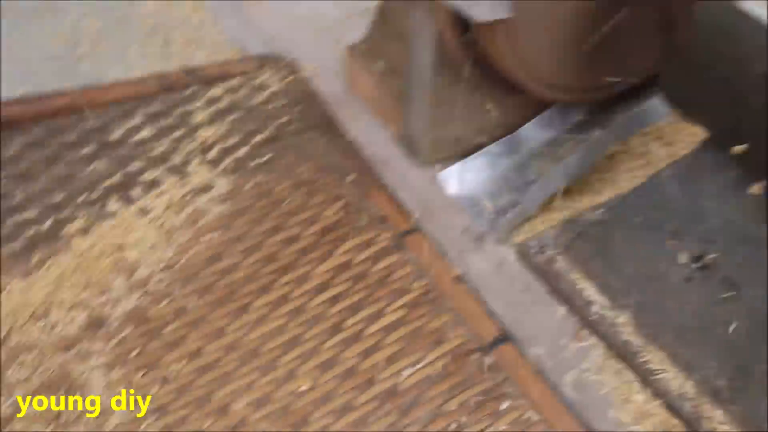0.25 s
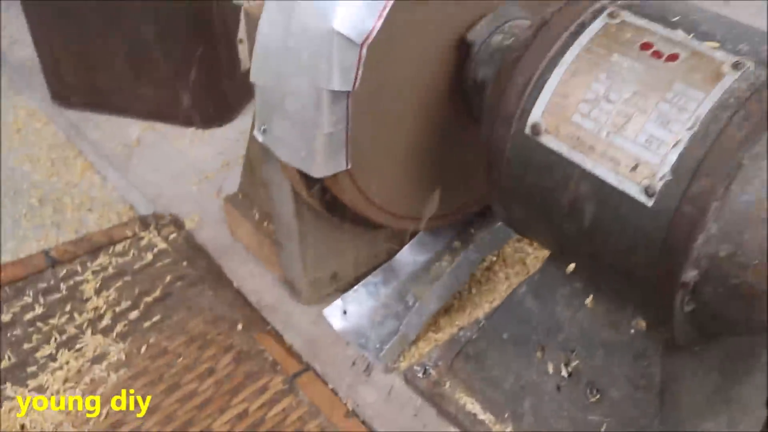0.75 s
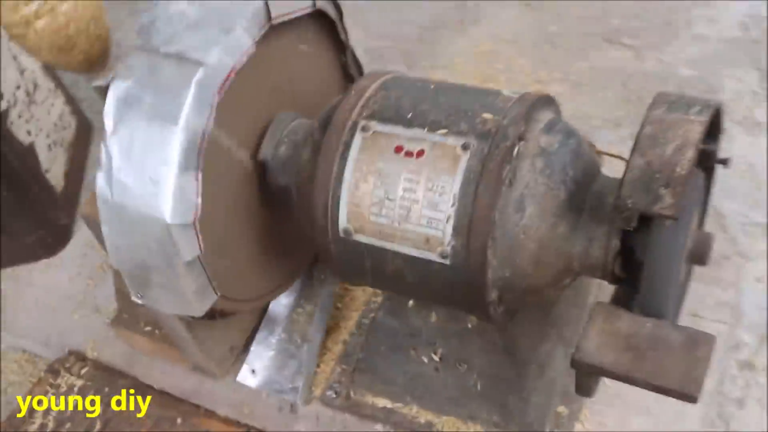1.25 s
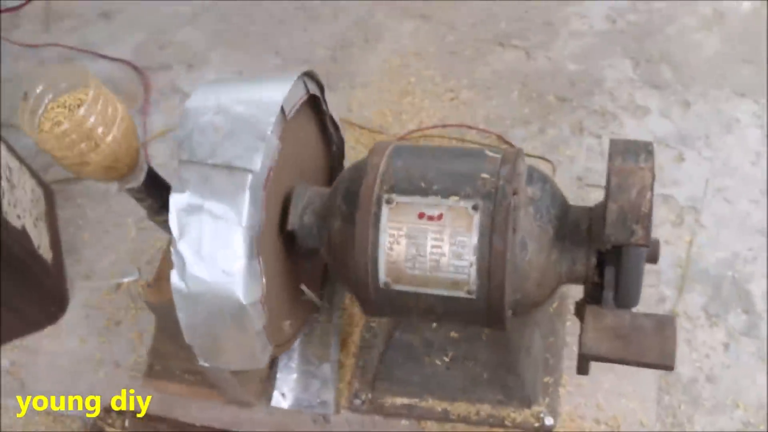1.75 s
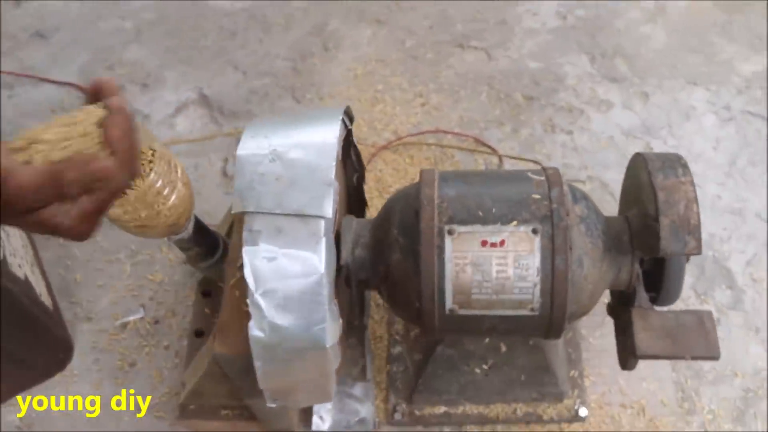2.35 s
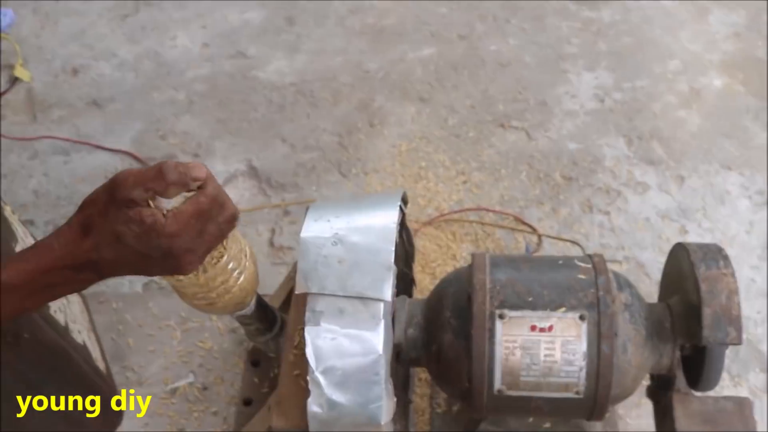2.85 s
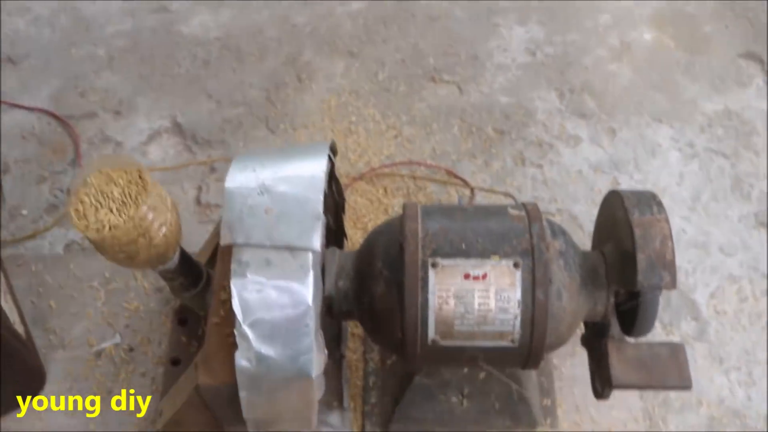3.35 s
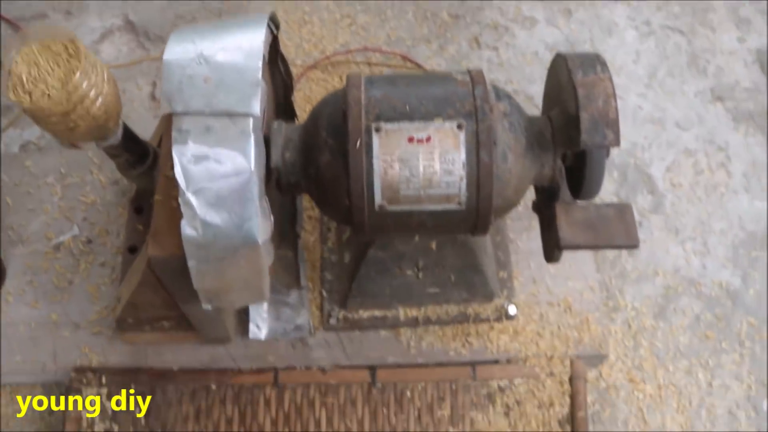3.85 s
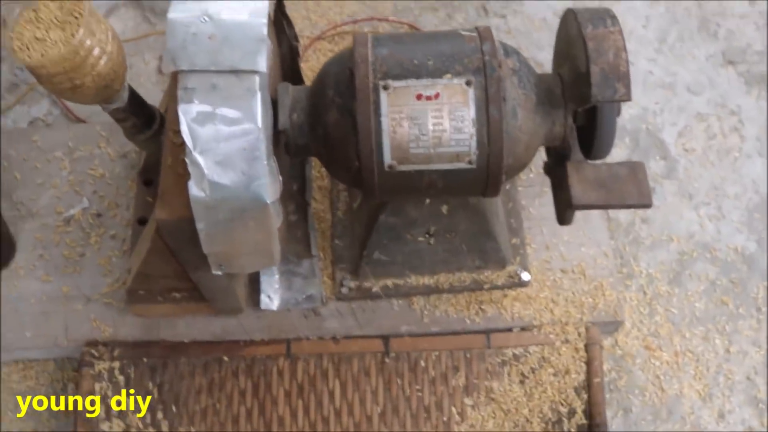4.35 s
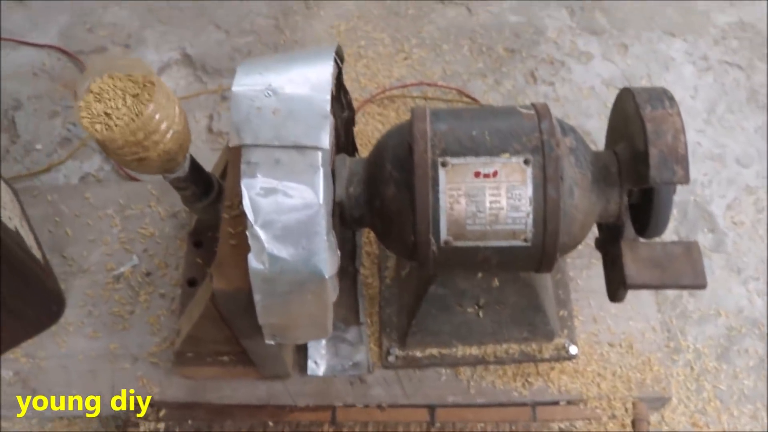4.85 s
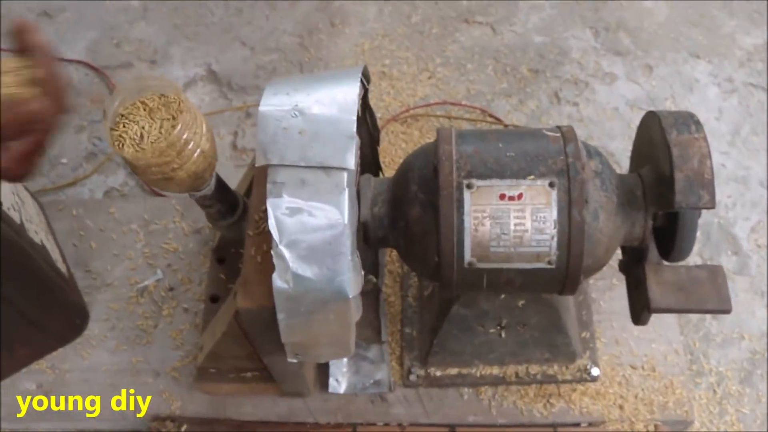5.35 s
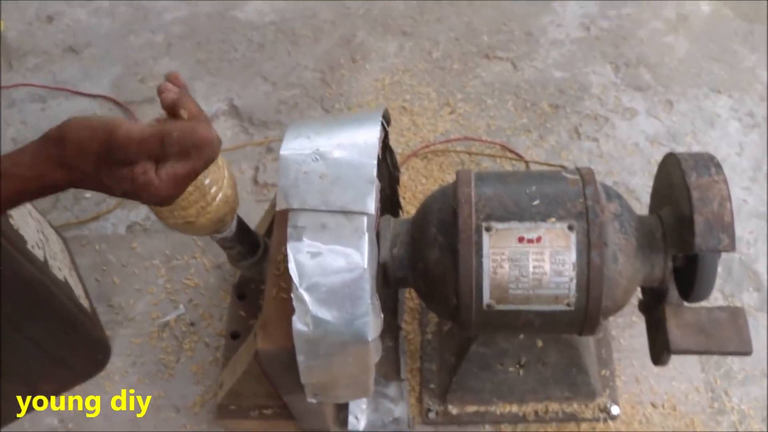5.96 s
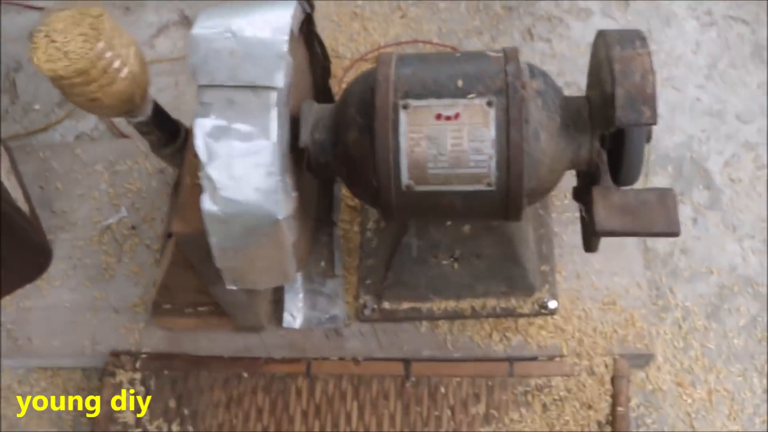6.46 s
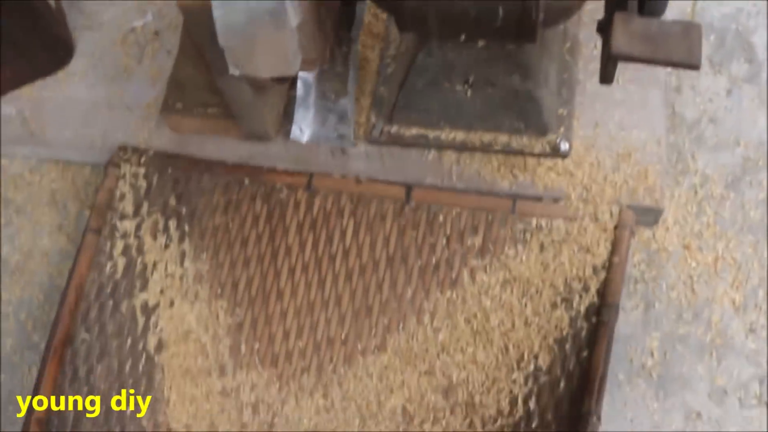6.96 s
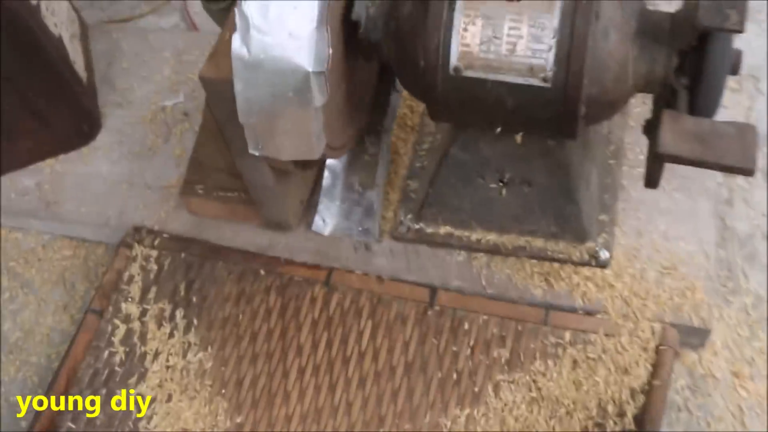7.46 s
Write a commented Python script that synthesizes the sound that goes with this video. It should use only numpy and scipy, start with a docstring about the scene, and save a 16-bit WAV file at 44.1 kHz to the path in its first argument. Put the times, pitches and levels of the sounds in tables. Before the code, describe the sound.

Close, unbroken harsh rasp of paddy being husked, peppered with kernel cracks and taps on sheet metal, over a faint steady motor hum.

```python
"""A dense crackle of paddy husked by a steadily turning bench grinder, heard from close above.
Grain contacts are enveloped noise and clicks; kernels crack, tick on sheet metal and ring its modes.
Beneath them the casing rubs as noise modulated by the turning disc, the motor hums in sine harmonics
of the shaft speed, and the base sounds as filtered noise. A moving microphone shifts the levels."""
import sys
import numpy as np
from scipy import signal
from scipy.fft import rfft, irfft, next_fast_len
from scipy.io import wavfile
from scipy.ndimage import uniform_filter1d, map_coordinates

SR = 44100
rng = np.random.default_rng(int(sys.argv[2]) if len(sys.argv) > 2 else 0)


def wrap_up_sound(samples):
    """Save the sound to the file named by the first command line argument, as 16-bit audio."""
    columns = np.atleast_2d(samples).T
    # keep every value between -1 and 1, then stretch to whole-number steps
    tamed = np.clip(columns, -1, 1)
    steps = np.round(tamed * 32767).astype(np.int16)
    wavfile.write(sys.argv[1], SR, steps)


N = 340011

# Levels in the tables are relative: layer trims, resonances and ports act after them.
# grain being worked, on average: (time [s], rasp level [dB], spray level [dB])
FEED = [(0.0, -30.5, -34), (0.25, -32.5, -35.5), (0.55, -32, -35), (1.1, -32.5, -37), (1.7, -32, -35),
        (2.1, -33.5, -34.5), (2.75, -31.5, -36.5), (3.3, -32.5, -35), (4.0, -31, -34.5), (4.75, -32, -36.5),
        (5.5, -32.5, -36), (6.25, -31, -38), (6.7, -32, -37.5), (7.25, -33.5, -33.5), (7.71, -35.5, -38.5)]
# gulps of paddy: (time [s], width at half height [s], rasp gain [dB], spray gain [dB])
GULPS = [(0.375, 0.021, -1, 6), (0.576, 0.021, 2.5, 6), (1.02, 0.075, 4.5, -2), (1.406, .03, 2.5, -4),
         (1.908, 0.024, 4, 5), (2.778, 0.042, 3, 3), (4.494, 0.096, 0, 5.5), (4.632, 0.03, 4.5, 1),
         (4.889, .04, 5, 4), (4.954, 0.018, 1, 10), (5.09, 0.04, 2.5, 4), (5.327, 0.038, 0, 3.5),
         (5.847, 0.12, 3, 5), (6.214, 0.02, 3, 7.5), (6.775, 0.037, 3, 5), (7.67, 0.086, 5.5, 6)]
# moments when the hopper's neck starves: (time [s], width at half height [s], drop [dB])
LULLS = [(0.193, 0.041, 4), (0.356, 0.018, 3.5), (0.717, 0.012, 4.5), (1.273, 0.017, 5), (1.34, 0.04, 2.5),
         (1.736, 0.027, 3), (1.858, 0.019, 4), (2.187, .012, 3), (3.252, 0.02, 8), (3.791, 0.026, 9.5),
         (4.41, 0.024, 8), (4.54, 0.039, 5.5), (4.928, 0.025, 5), (4.978, 0.026, 6), (5.653, .035, 5.5),
         (5.765, 0.043, 5), (6.435, 0.018, 1), (6.833, 0.021, 4), (6.977, 0.033, 4.5)]
# kernels crushed under the disc: (time [s], peak level [dB], pitch [Hz])
CRACKS = [(0.0672, -17, 3840), (0.0872, -20, 3700), (0.119, -21, 4720), (0.1514, -23, 5050),
          (0.269, -20.5, 4820), (0.2883, -19, 4660), (0.386, -21, 3670), (0.5524, -18.5, 5230),
          (0.5833, -21, 5200), (0.6764, -18, 5030), (0.817, -17, 3560), (0.993, -16, 5600),
          (1.0066, -16, 3400), (1.0184, -16, 3650), (1.1164, -17, 4700), (1.1977, -15.5, 3330),
          (1.389, -25, 5210), (1.4094, -12, 4400), (1.6891, -20, 3730), (2.015, -17, 4530),
          (2.33, -16, 5080), (2.4683, -19, 5760), (2.4826, -18, 5580), (2.651, -12, 5100),
          (2.677, -14, 5500), (2.764, -18, 5160), (2.8795, -24, 5740), (3.039, -21, 5650),
          (3.3423, -18, 4200), (3.4454, -16, 5540), (3.5756, -14, 3820), (3.628, -17, 3560),
          (3.8781, -18, 3850), (3.9993, -18, 5300), (4.0825, -19, 3760), (4.1684, -24, 4000),
          (4.2917, -14, 4300), (4.442, -14.5, 5800), (4.6215, -23, 4240), (4.692, -19, 4280),
          (4.638, -16, 5740), (4.7102, -15, 5360), (4.8075, -14.5, 3890), (4.825, -12.5, 4060),
          (4.861, -22, 4130), (4.8815, -19, 5670), (5.0347, -16, 5700), (5.0866, -17, 4090),
          (5.4136, -20, 4950), (5.441, -17, 3900), (5.4564, -16.5, 3860), (5.674, -15, 4550),
          (5.8157, -16.5, 4080), (5.905, -21, 3830), (6.0463, -15, 5730), (6.055, -14.5, 4480),
          (6.115, -20, 4050), (6.127, -17, 4000), (6.2043, -20, 4110), (6.2228, -19, 3740),
          (6.2417, -13, 3800), (6.3031, -14, 5900), (6.328, -16, 4400), (6.395, -16, 4040),
          (6.477, -14.5, 5170), (6.534, -14, 3840), (6.54, -21, 3920), (6.622, -12, 4900),
          (6.7943, -17, 4010), (6.931, -24, 5500), (7.0078, -16.5, 5700), (7.4455, -18, 3770),
          (7.454, -17, 4600), (7.574, -23, 5610)]
# grains flung against sheet metal: (time [s], peak level [dB])
TICKS = [(0.0074, -21), (0.1116, -19), (0.2349, -22), (0.3691, -22), (0.3785, -15), (0.4494, -16.5),
         (0.5407, -19), (0.5641, -22), (0.7574, -16.5), (0.7996, -14.5), (0.8729, -16), (0.9792, -15),
         (1.1882, -17), (1.4264, -20), (1.4504, -15), (1.4864, -25), (1.6904, -16), (1.8906, -24),
         (1.92, -15), (1.9744, -18), (2.1362, -20), (2.1625, -18), (2.1695, -19), (2.1946, -20),
         (2.1985, -20), (2.2124, -19), (2.2413, -15.5), (2.4595, -19), (2.5625, -21), (2.8958, -17),
         (3.1165, -19), (3.3704, -21), (3.4705, -22), (3.5285, -17), (3.5917, -15), (3.713, -23),
         (3.8277, -16), (3.8444, -18), (3.916, -14), (3.9584, -18), (3.9884, -17), (4.0627, -15),
         (4.1297, -15), (4.1834, -17), (4.2009, -20), (4.3635, -21), (4.4657, -21), (4.705, -17),
         (4.7305, -17), (4.8189, -18), (4.8788, -24), (4.8973, -16), (4.9442, -21), (5.0524, -17),
         (5.1617, -20), (5.2135, -20), (5.252, -19), (5.3023, -19), (5.3226, -17), (5.3495, -19),
         (5.5039, -17), (5.528, -18), (5.675, -21), (5.8244, -18), (6.0457, -20), (6.115, -12.5),
         (6.1574, -16), (6.3505, -16), (6.3979, -14.5), (6.4734, -18), (6.4946, -18), (6.565, -18),
         (6.6014, -12), (6.6633, -15), (6.7095, -14), (6.736, -12), (6.8648, -17), (6.9301, -14),
         (7.0459, -17), (7.0868, -20), (7.0958, -14), (7.293, -18.5), (7.341, -15), (7.3887, -17.5),
         (7.4949, -16), (7.5748, -16), (7.611, -18), (7.6784, -18.5)]
# kernels that make the guard ring: (time [s], peak level [dB], favoured pitch [Hz])
PINGS = [(0.0682, -29, 2190), (0.0893, -26, 1800), (0.1511, -21, 1840), (0.3848, -21, 2340),
         (0.404, -21, 1900), (0.447, -23, 2280), (0.6764, -20, 2050), (0.9198, -21.5, 1840),
         (0.9941, -22, 2300), (1.0195, -21.5, 2220), (1.1638, -29, 1820), (1.1974, -22, 2050),
         (1.3972, -20, 2100), (1.4103, -19, 2200), (1.691, -24, 2350), (1.915, -27, 2300),
         (1.997, -23, 2300), (2.4688, -21, 2360), (2.649, -20, 2320), (3.446, -21, 2000),
         (3.5732, -20, 2320), (3.6663, -23, 1770), (3.9784, -31, 1830), (4.108, -20.5, 2250),
         (4.2921, -27, 2000), (4.6094, -21.5, 2310), (4.808, -24, 1750), (4.8274, -23, 2300),
         (5.4425, -24, 2100), (5.886, -22, 2290), (5.9174, -31, 1840), (6.003, -26, 2310),
         (6.017, -23, 2310), (6.1438, -21.5, 2300), (6.2053, -21.5, 1950), (6.223, -23, 2280),
         (6.3949, -23.5, 2260), (6.9484, -22.5, 1820), (7.0945, -26, 1810), (7.328, -24, 1830),
         (7.3395, -27, 1820), (7.454, -23.5, 1900), (7.5522, -25, 1950), (7.66, -21.5, 2400)]
# modes of the sheet-metal guard: (frequency [Hz], level [dB])
GUARD_MODES = [(1640, -12), (1815, -1), (1950, -2), (2150, -6), (2300, -2.5), (2430, -3), (2880, -2),
               (3550, -1), (4050, -1)]
# spectra of the noise layers: (frequency [Hz], level [dB per Hz])
RASP_SPECTRUM = [(200, -66), (1000, -23.5), (1450, -13), (1750, -2.5), (2050, -8.5), (2350, 0.5),
                 (3000, -4.5), (3900, -0.5), (5300, 0), (6400, -5), (8500, -12), (16000, -10.5)]
SPRAY_SPECTRUM = [(200, -70), (1000, -21), (2000, -4.5), (4000, -3), (7000, -1.5), (8400, -2.5),
                  (10000, 2.5), (11200, 2.5), (12800, 0.3), (14500, 1), (16000, -0.5)]
OPENING_SPECTRUM = [(1000, -73), (4800, -2.5), (5800, -0.5), (7300, -7.5), (8500, -11), (12000, -37)]
CASING_SPECTRUM = [(20, -90), (120, -47), (220, -27), (300, -18.5), (500, -9.5), (660, -7), (780, -2),
                   (950, -2.5), (1150, -3), (1400, -6.5), (2000, -6.5), (4000, -23)]
BASE_SPECTRUM = [(20, -70), (55, -45), (100, -26), (150, -8.5), (230, -7.5), (300, 0.5), (480, 4.5),
                 (800, -17), (2000, -50)]
RUMBLE_SPECTRUM = [(20, -20), (50, -13), (80, -2), (120, 0), (200, -18), (500, -50)]
# microphone moving over the machine and away: (time [s], casing level [dB], guard opening level [dB])
VIEW = [(0.0, -47, -34), (0.5, -47.5, -46), (1.1, -46, -54), (1.6, -44, -35), (2.6, -42.5, -31),
        (3.35, -42.5, -30), (3.9, -43, -37), (4.8, -41.5, -40), (5.4, -42, -30.5), (6.1, -41, -36),
        (6.7, -44, -43), (7.2, -47.5, -48), (7.71, -46, -49)]
# nearness to each part: (time [s], chute [0-1], guard rim [0-1], tray [0-1])
NEARNESS = [(0, 0.9, 0.1, 0.6), (.6, 1, 0.5, 0.34), (1.2, 0.85, 0.3, 0.05), (1.7, 0.2, 0.8, 0.1),
            (2.3, 0.3, 0.7, 0.05), (3.4, 0.3, .85, 0.2), (4.0, 0.04, 0, 0), (5.4, 0, 0.1, 0.04),
            (6.3, 0, 0.2, 0), (6.9, 0.4, 0.4, 0.75), (7.4, 0.2, 0.2, 0.6), (7.71, 0.3, 0, 0.6)]
# resonances and hollows at those places: (frequency [Hz], width [Hz], peak or dip [dB])
AT_CHUTE = [(2840, 220, 4), (3540, 110, 3.5), (4050, 400, -2), (5000, 160, 2.5), (9050, 200, 1.5)]
AT_RIM = [(1840, 100, -7), (4530, 270, 0.5), (6600, 200, 3), (7300, 200, 4.5), (9000, 1100, -4),
          (12000, 500, 0)]
AT_TRAY = [(1790, 100, 2.5), (3080, 250, -6), (6130, 300, -4), (8160, 270, 6), (9100, 170, 9),
           (10900, 700, -4.5)]
# resonances of the housing: (frequency [Hz], width [Hz], peak [dB])
HOUSING = [(305.5, 17, 6), (402, 11, 5), (605, 36, 4.5), (702, 10, 5.5), (774, 30, 4), (848, 87, 6.5),
           (945, 23.4, 8.5), (1030, 23, 6.5), (1103, 32, 3.5), (1810, 17, 4), (2277, 25, 5), (4040, 130, 2),
           (5730, 210, 2.5), (7230, 250, 1.5)]
# motor hum: (multiple of shaft speed [1], level over HUM_DB [dB], share of the beaming [0-1])
HUM = [(1, -34, 0.1), (2, -20.5, 0), (3, -19, 0.15), (4, -12, 0.03), (5, -16.5, 0), (6, -12.5, 0),
       (7, -4.5, 1), (8, -8, 0.7), (9, -6.5, 0.3), (10, -3, 0.5)]
# hum beaming straight up from the motor: (time [s], level [dB])
HUM_BEAM = [(0, -2), (.75, -7), (1.25, -12), (1.75, -7), (2.2, 0.5), (3.3, 4.5), (3.8, 1), (4.3, 3.5),
            (5.2, 4.5), (5.7, 1), (6.2, 4.5), (6.7, -3), (7.2, -1), (7.71, -17)]
# swells of the second and fourth shaft orders: (time [s], level [dB])
SECOND_ORDER = [(0, -3), (.7, 0), (1.7, -4.5), (2.2, 0), (2.8, -1.5), (3.7, 0), (4.3, 4), (4.8, -2),
                (5.7, -3.5), (6.3, -1), (7.1, 1.5), (7.71, -4)]
FOURTH_ORDER = [(0, -9), (.8, -7), (1.4, 3.5), (2.7, -3), (3.7, -1), (4.3, 3), (4.8, 1), (5.7, 3.5),
                (6.6, 4), (7.2, 0), (7.71, 0)]
# iron base: (time [s], level [dB])
BASE_LEVEL = [(0, -61), (.8, -63.5), (1.7, -63.5), (2.7, -65.5), (3.6, -61.5), (4.5, -61), (5.7, -67),
              (6.7, -61), (7.2, -61), (7.71, -68)]
# left-right likeness of the noises: (frequency [Hz], correlation [-1 to 1])
ALIKE = [(100, 1), (400, 1), (800, 1), (1200, 0.83), (1550, 1), (2800, 0.73), (5600, 0.64), (10000, 0.59),
         (15000, 0.48)]
# sideways balance of the milling: (time [s], left minus right level [dB])
PAN = [(0.0, -6), (0.17, -7), (0.49, -4), (1.07, -3.5), (1.29, -2), (1.93, -2.5), (2.64, -3), (3.48, -3),
       (4.08, -1.5), (5.65, -3), (7.07, -1.5), (7.71, -2.5)]
# balance of the two microphone ports: (frequency [Hz], left minus right level [dB])
BALANCE_DB = [(850, 0), (1050, 1.3), (1300, 0.5), (2350, 0.5), (2600, 0), (3150, -1.5), (4050, -5.5),
              (5000, -2), (6300, 1.5), (7200, -0.7), (11500, -1), (13000, 0), (15000, 0)]
# phase between the ports: (frequency [Hz], lead of the left [rad])
PORT_PHASE = [(900, 0.0033), (1100, -0.19), (1700, -0.42), (3300, 0.65), (4100, -0.51), (4900, 0.37),
              (6100, -0.28), (7200, 0.22), (8500, 0.39), (10500, -0.5), (12500, -0.14), (14500, -.2)]
# arrival time at the ports: (time [s], lead of the right [ms])
LEAD = [(0, 0.047), (.2, 0.04), (.4, 0.024), (1.1, 0.0041), (2.2, 0.0036), (7.71, 0)]

SHAFT_HZ = 86.0  # mean speed
FLUTTER_PER_S, FLUTTER_DB = 36, 1.24  # the uneven trickle, common to rasp and spray
RASP_FLUTTER_DB, SPRAY_FLUTTER_DB = 0.5, 0.47  # each layer's own unevenness
# further contacts at chance moments: rate [per s], mean peak [dB], spread [dB]
MORE_CRACKS, MORE_TICKS, MORE_PINGS = (1.8, -18, 1.8), (5.5, -30, 2.2), (2, -35, 2.2)
SNAP_WIDTH, SNAP_T60_S = 0.197, 0.019  # cracked kernel: relative spread of modes, decay
HUSKS_PER_S, HUSK_DB, HUSK_SPREAD_DB = 80, 4.5, 1.3  # peak over the rasp level, scatter
HUSK_HZ, HUSK_SPREAD = 4496, 0.216  # usual pitch, relative scatter
HUSK_WIDTH, HUSK_T60_S = 0.172, 0.013  # relative spread of modes, decay
GUARD_HZ, GUARD_SPREAD = 2290, 0.064  # usual pitch of the chance pings, relative scatter
PING_FALL_DB_PER_OCT, PING_DETUNE = 24, 0.012  # fall away from the favoured pitch, relative mode scatter
PING_T60_S, PING_ATTACK_S = 0.027, 0.00025
PING_KNOCK_DB = -15  # knock relative to the tabled ping peak
CASING_LOW_HZ = 170  # casing and grain are hardly radiated below this
HUM_DB = -55.5
HUM_SHAKE_PER_S, HUM_SHAKE_RAD = 30, 0.09  # grain jolts the disc: phase jitter per shaft order
RUMBLE_DB, RUMBLE_SWING_DB = -83.5, 5
TOP_HZ = 15900  # band limit
SIDES = np.array([[0.5], [-0.5]])  # splits a left-minus-right difference between the channels


def grain_flow():
    """Modulation of a granular flow: a slow feed in dB that flutters, gulps and starves."""
    rasp_db, spray_db = curves(FEED)
    flutter = FLUTTER_DB * wobble(FLUTTER_PER_S)
    rasp_db = rasp_db + flutter + RASP_FLUTTER_DB * wobble(22)
    spray_db = spray_db + flutter + SPRAY_FLUTTER_DB * wobble(45)
    for s, length, more_rasp_db, more_spray_db in GULPS:
        gulp = swell(s, length)
        rasp_db = rasp_db + more_rasp_db * gulp
        spray_db = spray_db + more_spray_db * gulp
    starved_db = sum(drop_db * swell(s, length) for s, length, drop_db in LULLS)
    return rasp_db - starved_db, spray_db - starved_db


def rasp(rasp_db):
    """Shot noise of abrasion: husks are torn off in a dense crackle of short contacts."""
    crackle = shower(rate=1100, spread_db=2.5, t60=0.0087, tail_db=-6, clump_db=-0.5)
    return amp(rasp_db - 1.5) * crackle * rush(RASP_SPECTRUM, patchy_db=1.5)


def husks(rasp_db):
    """Impulsive fracture: single husks split in small pitched clicks above the crackle."""
    rows = []
    for s, peak_db in strays(HUSKS_PER_S, HUSK_DB, HUSK_SPREAD_DB):
        rows.append((s, peak_db, HUSK_HZ * np.exp(HUSK_SPREAD * rng.standard_normal())))
    return amp(rasp_db) * clusters(rows, HUSK_WIDTH, HUSK_T60_S, attack=0.00012)


def cracks():
    """Brittle fracture: whole kernels snap in a noise burst; the tabled ones also ring briefly."""
    s, peak_db = np.vstack([np.array(CRACKS)[:, :2], strays(*MORE_CRACKS)]).T
    envelope = bursts(s, amp(peak_db - 9.5), rise=0.00036, t60=0.021, tail_db=-14.5, tail_t60=0.12)
    snap = envelope * rush(RASP_SPECTRUM, patchy_db=1.0)
    return snap + amp(-5.0) * clusters(CRACKS, SNAP_WIDTH, SNAP_T60_S, attack=0.00042)


def spray(spray_db, opening_db):
    """Shot noise of impacts: chaff and kernels pepper the guard; hiss spills from its open rim."""
    hail = shower(rate=850, spread_db=4.0, t60=0.0049, tail_db=-5.5, clump_db=1.1)
    on_guard = amp(spray_db + 3.0) * rush(SPRAY_SPECTRUM, patchy_db=1.5)
    from_rim = amp(opening_db - 7.0) * rush(OPENING_SPECTRUM, patchy_db=4.5)
    return hail * (on_guard + from_rim)


def ticks():
    """Impact excitation: single fast grains give a hard tap on sheet metal and a short rattle."""
    s, peak_db = np.vstack([TICKS, strays(*MORE_TICKS)]).T
    taps = bursts(s, amp(peak_db - 5.0), rise=0.0001, t60=0.016, tail_db=-1.5, tail_t60=0.038)
    return taps * rush(SPRAY_SPECTRUM, patchy_db=1.0)


def pings():
    """Modal excitation: a kernel rings all the guard's modes, favouring those near one pitch."""
    rows = list(PINGS)
    for s, peak_db in strays(*MORE_PINGS):
        rows.append((s, peak_db, GUARD_HZ * np.exp(GUARD_SPREAD * rng.standard_normal())))
    out, t = np.zeros((2, N + SR)), np.arange(SR // 25) / SR
    envelope = (1 - np.exp(-t / PING_ATTACK_S)) * amp(-60 * t / PING_T60_S)
    mode_hz, mode_db = np.transpose(GUARD_MODES)[:, :, None]
    for s, peak_db, hz in rows:
        detune, size, phase, skew = rng.standard_normal((4, len(mode_hz), 1))
        fall_db = PING_FALL_DB_PER_OCT * np.abs(np.log2(mode_hz / hz))
        cycles = mode_hz * np.exp(PING_DETUNE * detune) * t + phase
        stereo_phase = 0.2 * np.array([skew, -skew])
        ring = amp(mode_db + 2.1 * size - fall_db) * np.sin(2 * np.pi * cycles + stereo_phase)
        add_blow(out, s, ring.sum(axis=1) * envelope, peak_db - 1.9)
    return out[:, :N]


def knocks():
    """Broadband contact force: the dull knock with which each tabled ping begins."""
    s, peak_db, _ = np.transpose(PINGS)
    thud = bursts(s, amp(peak_db + PING_KNOCK_DB), rise=0.00084, t60=0.037, tail_db=-18, tail_t60=0.05)
    return thud * rush(RASP_SPECTRUM, patchy_db=9.5)


def shaft_angle():
    """Phase is integrated angular speed: the disc turns with a slight slow drift."""
    return 2 * np.pi * np.cumsum(SHAFT_HZ * (1 + 0.00251 * wobble(2.5))) / SR


def casing(angle, casing_db):
    """Amplitude modulation by rotation: the untrue disc's rub swells once and twice a turn."""
    drag = unit(amp(1.55 * np.cos(angle) + 0.77 * np.cos(2 * angle)))
    return amp(casing_db - 1.5 + 0.62 * wobble(45)) * drag * rush(CASING_SPECTRUM, patchy_db=1.7)


def motor(angle, beam_db):
    """Harmonic series of a rotor: sines on the shaft orders, with phase jitter growing with order."""
    own_db = {2: curves(SECOND_ORDER)[0], 4: curves(FOURTH_ORDER)[0]}
    hum = 0
    for k, order_db, share in HUM:
        jitter = 0.12 * wobble(14) + HUM_SHAKE_RAD * wobble(HUM_SHAKE_PER_S)
        phase = k * (angle + jitter) + rng.uniform(0, 2 * np.pi)
        fade_db = 3.9 * wobble(16) + 1.0 * wobble(3.08)
        level_db = HUM_DB + order_db + share * beam_db + own_db.get(round(k), 0) + fade_db
        hum = hum + amp(level_db) * np.sqrt(2) * np.sin(phase)
    return hum


def base():
    """Structure-borne noise: the motor shakes its iron base; a very faint low rumble lies beneath."""
    level_db, = curves(BASE_LEVEL)
    rumble_db = RUMBLE_DB + RUMBLE_SWING_DB * wobble(11)
    rumble = amp(rumble_db) * rush(RUMBLE_SPECTRUM, patchy_db=1.0)
    return amp(level_db + 2.3 * wobble(14)) * rush(BASE_SPECTRUM, patchy_db=1.5) + rumble


def ringing(modes, hz):
    """Resonance: response of narrow second-order peaks or dips added to the direct sound."""
    response = 1
    for centre, width, db in modes:
        damping = 1j * hz * width
        response = response + (amp(db) - 1) * damping / (centre ** 2 - hz ** 2 + damping)
    return response


def passing(x):
    """Near-field colouring: each part lends its resonances as the microphone comes near."""
    out = x
    for near, modes in zip(curves(NEARNESS), (AT_CHUTE, AT_RIM, AT_TRAY)):
        out = out + np.clip(near, 0, 1) * filtered(x, lambda hz: ringing(modes, hz) - 1)
    return out


def shower(rate, spread_db, t60, tail_db, clump_db):
    """Random superposition: clumped small contacts, evened in power over about 1/15 s."""
    when, size = rng.random((int(rate * N / SR), 2)).T
    sizes = amp(spread_db * np.minimum(-np.log(1 - size), 3.7))
    hail = bursts(when * N / SR, sizes, rise=0.0001, t60=t60, tail_db=tail_db, tail_t60=0.028)
    hail = hail * amp(clump_db * wobble(80))
    return hail / np.sqrt(np.abs(uniform_filter1d(hail ** 2, size=SR // 15)) + 1e-12)


def bursts(times, sizes, rise, t60, tail_db, tail_t60):
    """Addition of powers: each contact flares, dies fast and rattles on more faintly."""
    t = np.arange(SR // 8) / SR
    decay = amp(-60 * t / t60) ** 2 + amp(tail_db - 60 * t / tail_t60) ** 2
    shape = (1 - np.exp(-t / rise)) ** 2 * decay
    blows = np.bincount(np.clip(times * SR, 0, N - 1).astype(int), sizes ** 2, N)
    return np.sqrt(np.abs(signal.fftconvolve(blows, shape / shape.max())[:N]))


def clusters(rows, width, t60, attack):
    """Modal ringing: each (time, peak, pitch) row sounds eight damped modes, drawn afresh."""
    out, t = np.zeros((2, N + SR)), np.arange(SR // 25) / SR
    envelope = (1 - np.exp(-t / attack)) * amp(-60 * t / t60)
    for s, peak_db, hz in rows:
        detune, size, phase, skew = rng.standard_normal((4, 8, 1))
        # the first mode lies on the pitch, later ones scatter more widely
        modes = hz * np.exp(width * detune * np.linspace(0, 1, len(detune))[:, None])
        stereo_phase = hz / 9000 * np.array([skew, -skew])
        ring = amp(3.8 * size) * np.sin(2 * np.pi * (modes * t + phase) + stereo_phase)
        add_blow(out, s, ring.sum(axis=1) * envelope, peak_db)
    return out[:, :N]


def add_blow(out, s, blow, peak_db):
    """Linear superposition: add a stereo blow at time s, scaled to its peak level."""
    out[:, max(round(s * SR), 0):][:, :blow.shape[1]] += amp(peak_db) * blow / np.abs(blow).max()


def strays(rate, mean_db, spread_db):
    """Chance arrivals: rows (time [s], peak level [dB]) spread uniformly in time and level."""
    when, size = rng.random((int(rate * N / SR), 2)).T
    return np.column_stack([when * N / SR, mean_db + spread_db * np.sqrt(3) * (2 * size - 1)])


def rush(spectrum, patchy_db):
    """Partly coherent stereo noise of rms 1 with a patchy, shifting colour."""
    z = signal.stft(rng.standard_normal((2, N)), nperseg=256)[2]
    field = uniform_filter1d(rng.standard_normal(z.shape[1:]), size=9, axis=0)
    field = uniform_filter1d(field, size=3, axis=1)
    pair = signal.istft(z * amp(patchy_db * unit(field)), nperseg=256)[1][:, :N]

    def mid_side(hz):
        turn = np.arccos(np.clip(along(ALIKE, hz), -1, 1)) / 2
        return amp(along(spectrum, hz)) * np.array([np.cos(turn), np.sin(turn)])

    mid, side = filtered(pair, mid_side)
    return unit(np.array([mid + side, mid - side]))


def swell(s, length):
    """Gaussian pulse: height 1 at time s, length seconds wide at half height."""
    return 0.5 ** np.minimum((2 * (np.arange(N) / SR - s) / length) ** 2, 60)


def wobble(rate):
    """Band-limited modulation: a smooth random curve with rate knots a second."""
    return map_coordinates(rng.standard_normal(int(N * rate / SR) + 4), [np.arange(N) * rate / SR])


def curves(rows):
    """Linear interpolation in time: one value per sample for each column after the first."""
    s, *cols = np.transpose(rows)
    return [np.interp(np.arange(N) / SR, s, c) for c in cols]


def along(points, hz):
    """Interpolation on a logarithmic frequency axis."""
    f, v = np.transpose(points)
    return np.interp(np.log(hz + 1), np.log(f + 1), v)


def filtered(x, response):
    """Linear filtering: the spectrum of x times a response of frequency."""
    m = next_fast_len(N + 8192)
    return irfft(rfft(x, m) * response(np.fft.rfftfreq(m, 1 / SR)), m)[..., :N]


def delayed(x, lag_ms):
    """Propagation delay: x read later by a moving lag."""
    return map_coordinates(x, [np.arange(N) - lag_ms * SR / 1000], order=5)


def amp(db):
    """Decibel law: level to amplitude gain."""
    return 10 ** (np.asarray(db) / 20)


def unit(x):
    """Normalisation to rms 1."""
    return x / np.sqrt(np.mean(x ** 2) + 1e-20)


def scene():
    """Superposition of sources: the milling swings sideways as the microphone turns."""
    rasp_db, spray_db = grain_flow()
    casing_db, opening_db = curves(VIEW)
    beam_db, = curves(HUM_BEAM)
    pan_db, = curves(PAN)
    angle = shaft_angle()
    milling = rasp(rasp_db) + husks(rasp_db) + cracks() + knocks() + pings()
    milling = milling * amp(SIDES * (pan_db + 1.5))
    flying = spray(spray_db, opening_db) + ticks()
    machine = passing(milling + flying) + casing(angle, casing_db)
    radiated = filtered(machine, lambda hz: 1 - 1 / (1 + (hz / CASING_LOW_HZ) ** 4))
    housed = filtered(radiated + base(), lambda hz: ringing(HOUSING, hz))
    return housed + motor(angle, beam_db)


def record(dry):
    """Two-port reception: level, phase and delay differences, a bass roll-off and a band limit."""
    lead_ms, = curves(LEAD)
    pair = np.array([delayed(dry[0], lead_ms), dry[1]])

    def response(hz):
        balance = amp(SIDES * along(BALANCE_DB, hz))
        phase = np.exp(1j * SIDES * along(PORT_PHASE, hz))
        bass_cut = (1j * hz / (1j * hz + 55)) ** 2
        return balance * phase * bass_cut * (hz < TOP_HZ)

    return filtered(pair, response)


dry = scene()
out = record(dry)
wrap_up_sound(out)
```